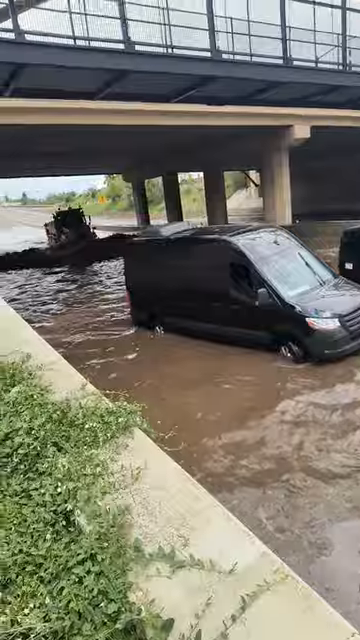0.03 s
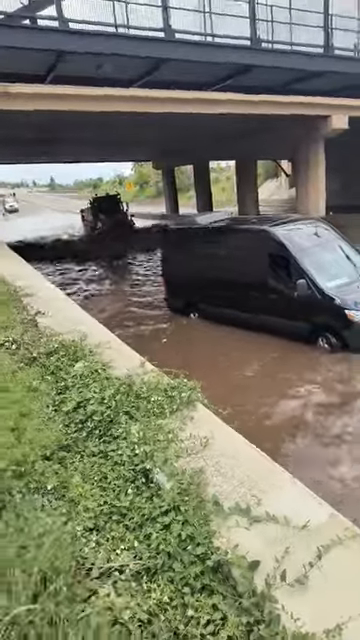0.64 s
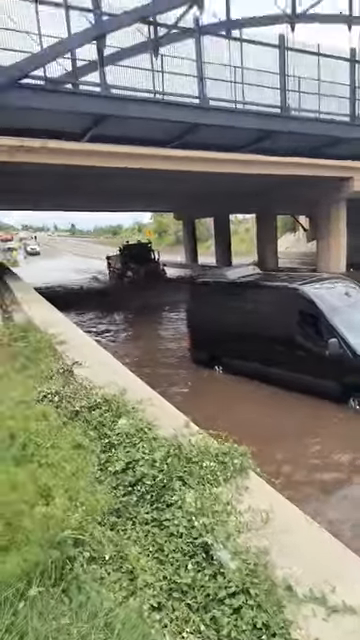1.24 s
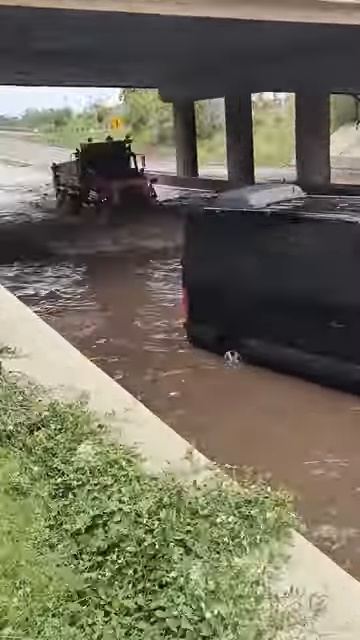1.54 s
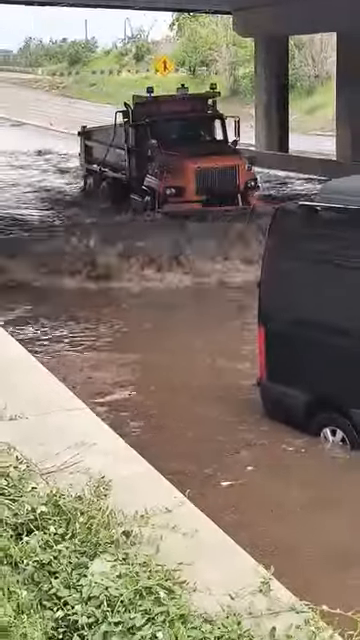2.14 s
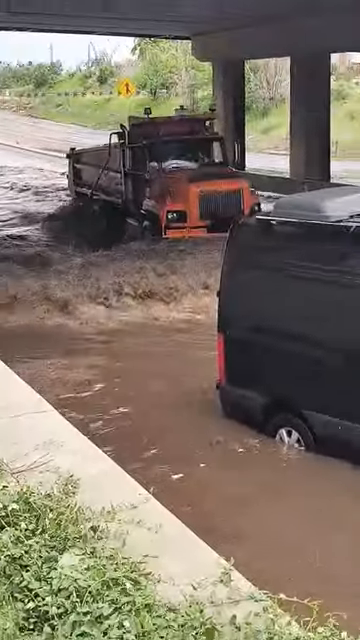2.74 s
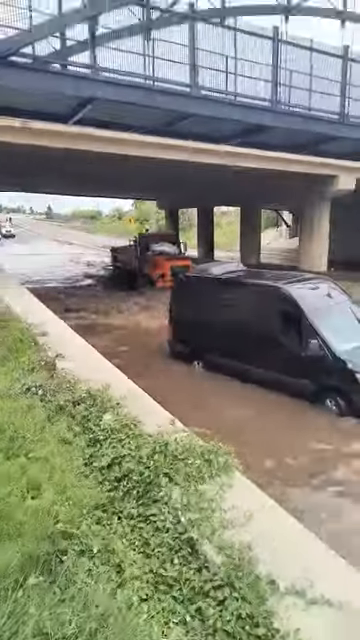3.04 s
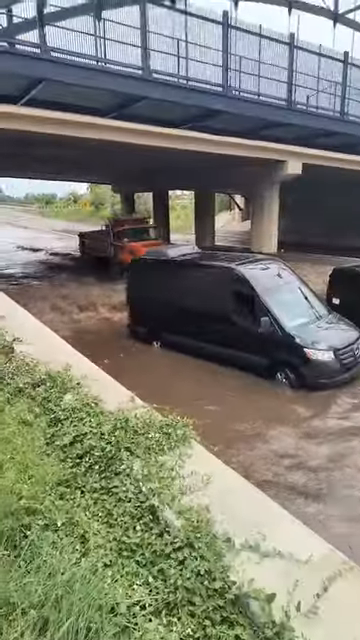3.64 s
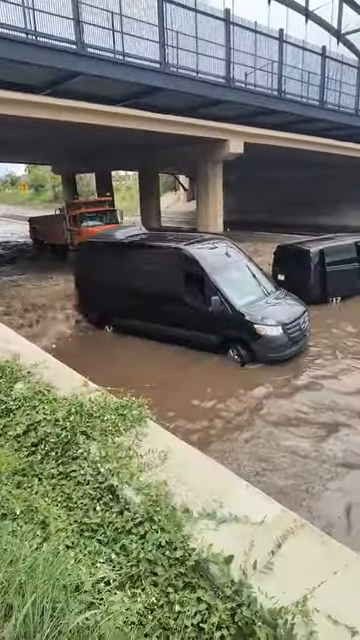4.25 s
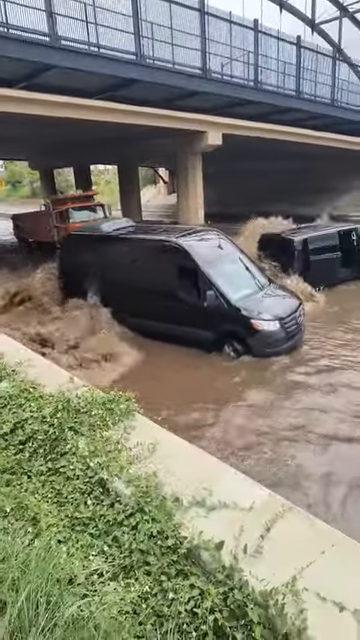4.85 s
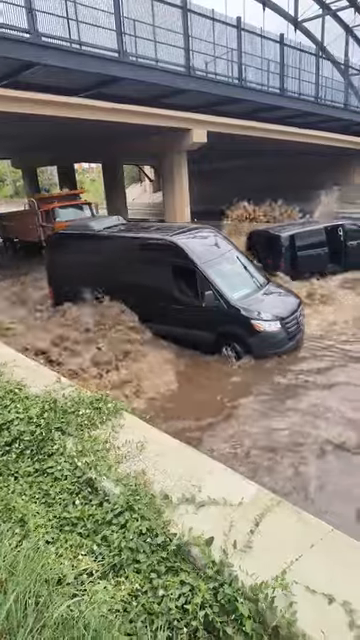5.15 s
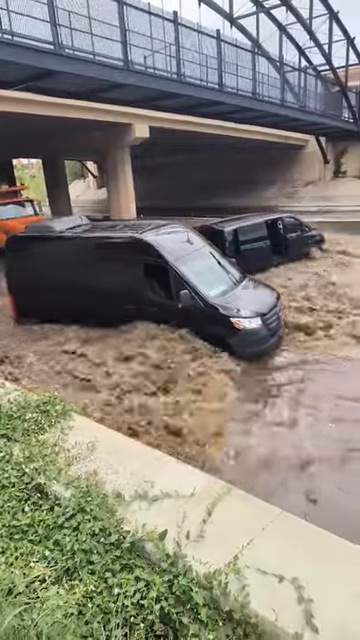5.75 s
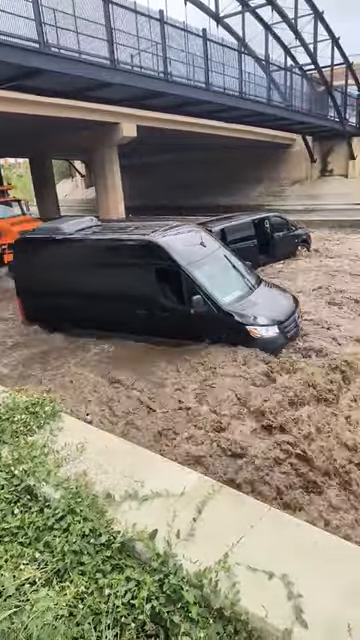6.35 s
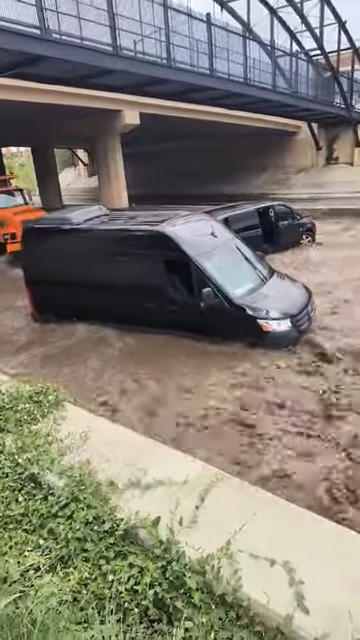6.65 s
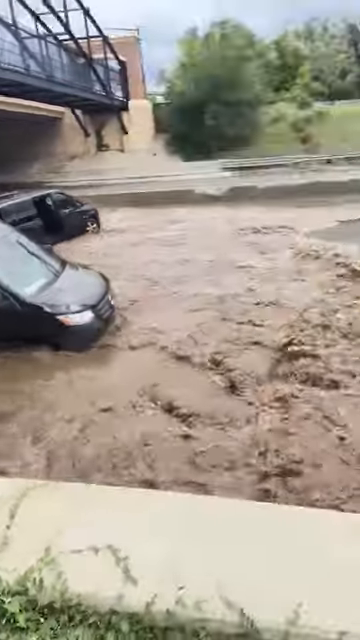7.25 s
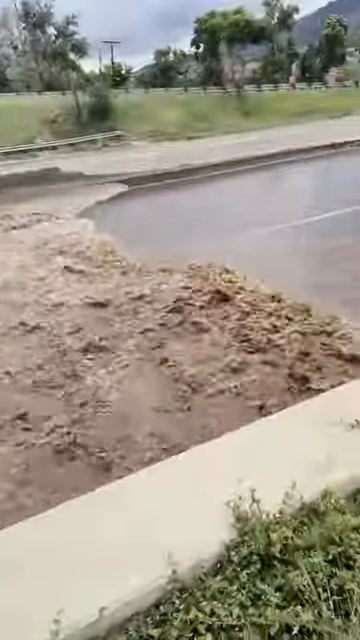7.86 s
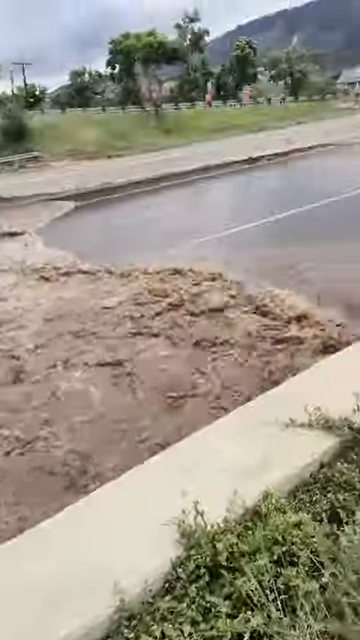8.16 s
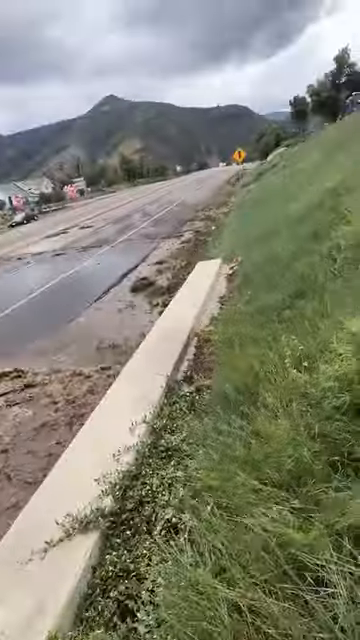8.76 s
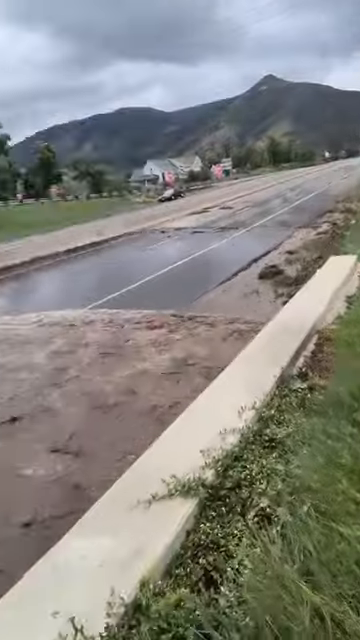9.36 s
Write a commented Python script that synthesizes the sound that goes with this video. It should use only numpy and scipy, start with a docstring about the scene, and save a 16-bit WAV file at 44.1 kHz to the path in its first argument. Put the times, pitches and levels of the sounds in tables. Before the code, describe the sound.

A heavy truck engine clatters and whistles through a flood, giving way to the splashing, gurgling rush of a passing wave.

```python
"""A diesel dump truck ploughs through floodwater under a highway bridge, heard from the bank.
First its firing pulses reverberate off the concrete, with fan tones and turbo whistles above them.
The throttle lifts at 1.1 s; water sheets off the bumper, and from 2.8 s the bow wave slaps two
stranded vans as the engine fades. The wave passes at about 6 s, churning, hissing and ringing
with bubbles, and rushes on up the road. Near 9 s come a faint far whine and rumble."""
import sys
import numpy as np
from scipy import signal
from scipy.fft import rfft, irfft, next_fast_len
from scipy.io import wavfile
from scipy.ndimage import uniform_filter1d, map_coordinates

SR = 44100
rng = np.random.default_rng(int(sys.argv[2]) if len(sys.argv) > 2 else 0)


def int16_out(signal):
    """Quantize to a 16-bit WAV file."""
    q = np.round(np.clip(np.atleast_2d(signal).T, -1, 1) * 32767)
    wavfile.write(sys.argv[1], SR, q.astype(np.int16))


N = 414540
TIME_S = np.arange(N) / SR


def amp(db):
    """Decibels to amplitude ratio."""
    return 10 ** (np.asarray(db) / 20)


def unit(x):
    """Normalisation to rms 1."""
    return x / np.sqrt(np.mean(x ** 2) + 1e-20)


def along(points, hz):
    """Interpolation of (frequency, value) points on a logarithmic frequency axis."""
    freqs, values = np.transpose(points)
    return np.interp(np.log(hz + 1), np.log(freqs + 1), values)


def curves(rows):
    """Linear interpolation in time of each column after the first."""
    times, *columns = np.transpose(rows)
    return [np.interp(TIME_S, times, column) for column in columns]


def wobble(rate_hz):
    """Smooth random modulation: a spline through Gaussian knots."""
    return map_coordinates(rng.standard_normal(int(N * rate_hz / SR) + 4), [TIME_S * rate_hz])


def phase(hz):
    """Phase as the integral of frequency."""
    return 2 * np.pi * np.cumsum(hz * np.ones(N)) / SR


def swell(start_s, end_s, db, attack_s, release_s):
    """Exponential rise, hold and decay: 20 dB down one attack before and one release after the hold."""
    early_s, late_s = np.maximum(start_s - TIME_S, 0), np.maximum(TIME_S - end_s, 0)
    return amp(db - 20 * (early_s / attack_s + late_s / release_s))


def step(at_s, takes_s):
    """A smooth transition from 0 to 1."""
    return .5 + .5 * np.tanh((TIME_S - at_s) / takes_s)


def filtered(x, response):
    """Filtering as multiplication of the spectrum by a frequency response."""
    size = next_fast_len(N + SR // 2)
    return irfft(rfft(x, size) * response(np.fft.rfftfreq(size, 1 / SR)), size)[..., :N]


# Left-right likeness of widespread sound: frequency_hz, correlation
WIDE_CORRELATION = [(60, 0.98), (130, 0.99), (290, 0.99), (640, 0.44), (1410, 0.56), (3100, 0.25),
                    (7000, -0.027), (15000, 0.022)]
def spread(pair, spectrum, correlation=WIDE_CORRELATION):
    """Mid-side mixing turns two independent signals into coloured, partly coherent stereo of rms 1."""
    def response(hz):
        angle = np.arccos(np.clip(along(correlation, hz), -1, 1)) / 2
        return amp(along(spectrum, hz)) * [np.cos(angle), np.sin(angle)]
    mid, side = filtered(pair, response)
    return unit(np.array([mid + side, mid - side]))


def patchy(depth_db):
    """Two noises, modulated by random patches of gain in time and frequency."""
    spectra = signal.stft(rng.standard_normal((2, N)), nperseg=512)[2]
    patches = uniform_filter1d(rng.standard_normal(spectra.shape[1:]), size=7, axis=0)
    patches = unit(uniform_filter1d(patches, size=10, axis=1))
    return unit(signal.istft(spectra * amp(depth_db * patches), nperseg=512)[1][:, :N])


def hiss_band(hz, width_hz):
    """Random quadrature modulation of a carrier gives narrow-band stereo noise."""
    carrier = phase(hz)
    band = lambda: wobble(2 * width_hz) * np.sin(carrier) + wobble(2 * width_hz) * np.cos(carrier)
    return unit(np.array([band(), band()]))


# Reverberation time under the bridge: frequency_hz, t60_s
BRIDGE_DECAY = [(100, 1), (1000, 0.84), (8000, 0.61)]
def bridge(x):
    """Reverberation from deck and piers: convolution with two noise tails whose treble dies first."""
    hz, t, spectra = signal.stft(rng.standard_normal((2, SR * 3 // 4)), SR, nperseg=256)
    decay = amp(-60 * t / along(BRIDGE_DECAY, hz)[:, None])
    tail = signal.istft(spectra * decay, SR, nperseg=256)[1]
    return signal.fftconvolve(x[None], tail / np.linalg.norm(tail[0]), axes=1)[:, :N]


# Airy hisses close by: start_s, end_s, level_db
WISP_TIMES = [(4.02, 4.08, -57), (9.0, 9.08, -69)]
# Their spectrum: frequency_hz, density_db
WISP_SPECTRUM = [(5000, -36), (10500, 0), (15000, 0.5)]
def wisps():
    """High-pass noise swells into brief, soft hisses."""
    envelope = sum(swell(*row, attack_s=.08, release_s=.2) for row in WISP_TIMES)
    return envelope * spread(patchy(depth_db=0.5), WISP_SPECTRUM)


def tick(at_s=3.392, pitch_hz=6900, level_db=-41, t60_s=0.15):
    """A damped sinusoid: one tiny ping that sags in pitch."""
    age_s = np.maximum(TIME_S - at_s, 0)
    envelope = amp(level_db - 60 * age_s / t60_s) * (age_s > 0)
    return envelope * np.sin(phase(pitch_hz + 350 * np.exp(-age_s / 0.0037)))


# A far whine stepping between two pitches: start_s, level_db, pitch_hz, glide_hz_per_s
WHINE_NOTES = [(8.915, -37, 1215, -700), (9.025, -38.5, 1185, -100), (9.075, -39, 1300, 3),
               (9.125, -38, 1210, -250), (9.18, -35.5, 1303, -11.5), (9.24, -37.5, 1215, -700)]
def whine(hold_s=0.049, echo_db=-7):
    """Propagation from far up the road: air and echo blur thin tones in amplitude and phase."""
    direct = np.zeros(N)
    for start_s, db, hz, glide in WHINE_NOTES:
        pitch_hz = hz + glide * np.clip(TIME_S - start_s, 0, 2 * hold_s)
        tone = unit(amp(1.2 * wobble(70)) * np.sin(phase(pitch_hz) + .35 * wobble(70)))
        direct += swell(start_s, start_s + hold_s, db, attack_s=.04, release_s=.06) * tone
    return (direct + amp(echo_db) * bridge(direct)) / np.hypot(1, amp(echo_db))


# Water sheeting off the bumper: frequency_hz, density_db
SHEET_SPECTRUM = [(500, -61.5), (1150, -18), (1400, -3.5), (1650, -3.5), (2000, 7), (2250, -2.5),
                  (2550, -5.5), (2900, 0.5), (3150, -1.5), (3500, -6), (3900, -5.5), (4200, -6.5),
                  (4600, -5.5), (5200, -9), (7000, -18.5), (10000, -83.5)]
def bumper_sheet():
    """Splash noise swells until the truck passes into the acoustic shadow of a van."""
    in_view = 1 - step(3.57, takes_s=0.077)
    envelope = in_view * swell(2.5, 2.5, db=-34.5, attack_s=2, release_s=2)
    return envelope * amp(0.54 * wobble(30)) * spread(patchy(depth_db=3.0), SHEET_SPECTRUM)


# Low swells of rumble: start_s, end_s, level_db, attack_s, release_s
RUMBLES = [(2.96, 3.15, -33.5, 0.17, 0.38), (3.692, 3.85, -33.5, 0.22, 0.28), (4.15, 4.5, -41, 0.28, 3.2),
           (8.899, 9.401, -49, 1, 1)]
# Their spectrum: frequency_hz, density_db
RUMBLE_SPECTRUM = [(20, -35), (60, -20), (105, -2.5), (210, 2.5), (330, -2), (600, -44), (2000, -120)]
def rumble():
    """Amplitude-modulated low noise: water heaving at 3-5 s, a faint far rumble near 9 s."""
    envelope = sum(swell(*row) for row in RUMBLES) * amp(1.5 * wobble(14))
    return envelope * spread(patchy(depth_db=2.0), RUMBLE_SPECTRUM)


def rings(rows, attack_s, t60_s, rise_per_s, roughness=.75):
    """Damped resonances that rise by a share of their pitch and flutter in amplitude and phase."""
    out, t = np.zeros(N + SR), np.arange(SR // 3) / SR
    for start_s, db, hz in rows:
        flutter, jitter = [roughness * map_coordinates(k, [t * 90]) for k in rng.standard_normal((2, 64))]
        envelope = (1 - np.exp(-np.square(t / attack_s))) * amp(db - 60 * t / t60_s)
        tone = np.sin(2 * np.pi * hz * t * (1 + rise_per_s * t / 2) + jitter)
        out[round(start_s * SR):][:len(t)] += envelope * (1 + flutter) * tone
    return out[:N]


# Air pockets under the crest: start_s, level_db, pitch_hz
AIR_POCKETS = [(5.44, -27, 475), (5.49, -27.5, 420), (5.635, -28, 273), (5.82, -30, 478), (5.86, -31, 271),
               (5.902, -25.5, 407), (6.149, -24, 380), (6.257, -24.5, 259), (6.3, -25, 373),
               (6.385, -23.5, 360), (6.41, -24, 438), (6.46, -24, 358), (6.675, -25.5, 424),
               (6.735, -24, 267), (7.06, -26, 477.8), (7.17, -30, 343), (7.36, -28, 350), (7.86, -29, 401)]
def gulps():
    """Bubble resonance: trapped air rings and rises in pitch as it surfaces."""
    return rings(AIR_POCKETS, attack_s=0.0054, t60_s=0.18, rise_per_s=1.7)


# Water striking the vans: start_s, level_db, pitch_hz
VAN_SLAPS = [(2.795, -17.5, 317), (2.965, -26, 270), (3.06, -22, 227.4), (3.69, -24.5, 396),
             (3.742, -21, 284), (3.85, -22.5, 253), (4.175, -30, 235), (4.432, -24.5, 333),
             (4.497, -29, 514), (4.765, -23.5, 246), (4.802, -25, 251), (4.845, -27, 289),
             (4.935, -32.5, 305)]
def slaps():
    """Impact excitation: each short shove of water booms against a van's side."""
    return rings(VAN_SLAPS, attack_s=0.006, t60_s=0.23, rise_per_s=0.068)


def passing_db(nearest_db, loss_share, lead_s=0):
    """Spherical spreading: a layer of the passing wave takes a share of the inverse-distance loss."""
    nearest_s, nearest_m, speed_m_per_s = 5.97, 7.5, 4.4
    distance_m = np.hypot(nearest_m, speed_m_per_s * (TIME_S + lead_s - nearest_s))
    return nearest_db - loss_share * 20 * np.log10(distance_m / nearest_m)


def bubbles(count, centre_hz, cycles, size_db):
    """Bubbles as damped oscillators of rising pitch, a few much louder than the rest, in two channels."""
    when, pitch, size, angle = rng.random((count, 4)).T[:, :, None]
    n = np.arange(384)
    turns = centre_hz * 4 ** (pitch - .5) * n / SR
    age = turns / cycles
    envelope = np.exp(-3 * age) * (1 - n / len(n)) * amp(size_db * np.minimum(-np.log(1 - size), 5))
    ring = envelope * np.sin(2 * np.pi * turns * (1 + 0.12 * np.minimum(age, 1)))
    at = ((when * N).astype(int) + n).ravel()
    panned = [ring * pan(2 * np.pi * angle) for pan in (np.cos, np.sin)]
    return unit(np.array([np.bincount(at, channel.ravel(), N)[:N] for channel in panned]))


# Two drifting bands of water hiss: time_s, centre_hz, level_db
HISS_UPPER = [(2.9, 4722, -64), (3.35, 4400, -54), (4.15, 4736, -46), (4.55, 4650, -51.5),
              (5.3, 4430, -40.5), (5.9, 4440, -44.5), (6.7, 4168, -40.5), (7.3, 4346, -44.5),
              (8.15, 4320, -43.5), (8.6, 4490, -54), (9.1, 4480, -48)]
HISS_LOWER = [(2.7, 3100, -63), (3.4, 3150, -45), (4.15, 2720, -46), (4.6, 2780, -46), (5.3, 2950, -41.5),
              (6.0, 3050, -48), (6.8, 3420, -42.5), (7.5, 3300, -48), (8.1, 3100, -46.5), (8.9, 3200, -53)]
def water_hiss(surge_db):
    """Narrow-band noise: two bands of water hiss drift in pitch and level as the microphone turns."""
    def band(hz, db, width_hz):
        gain = amp(db + surge_db + .3 * wobble(10) + 1.7 * wobble(50))
        return gain * hiss_band(hz + 50 * wobble(12), width_hz)
    return band(*curves(HISS_UPPER), width_hz=430) + band(*curves(HISS_LOWER), width_hz=340)


# Falling spray: frequency_hz, density_db
SPRAY_SPECTRUM = [(400, -64), (1900, 3), (2650, -5), (3100, -6.5), (3700, 0.5), (4500, -1.5), (5300, -7),
                  (6500, -11), (7700, -16), (8600, -33.5), (13000, -28), (15200, -21)]
def spray(surge_db):
    """Falling drops make broadband hiss and the high resonances of small bubbles."""
    drops = patchy(depth_db=1.5) + amp(-12) * bubbles(6000, centre_hz=3830, cycles=12.5, size_db=1.5)
    level_db = passing_db(-36.5, loss_share=1) + surge_db + 0.55 * wobble(60)
    return amp(level_db) * spread(drops, SPRAY_SPECTRUM)


# Air pockets in the folding crest: frequency_hz, density_db
FOLD_SPECTRUM = [(150, -50), (300, -9), (380, -6.5), (490, -5), (570, -2.5), (720, -24), (2500, -120)]
def fold():
    """Cavity resonance colours noise into a hollow roll as the crest folds over."""
    envelope = swell(6.5, 6.5, db=-34, attack_s=0.5, release_s=5.5) * amp(1.2 * wobble(20))
    return envelope * spread(patchy(depth_db=1.5), FOLD_SPECTRUM)


# Rushing water: frequency_hz, density_db
RUSH_SPECTRUM = [(80, -67), (300, -33), (550, -6.5), (760, -4), (950, -2), (1200, -4), (1600, -5.5),
                 (2000, -11.5), (2500, -15.5), (3500, -18), (9000, -110)]
def rush(surge_db):
    """Superposition: noise and thousands of bubble resonances merge into a rush."""
    gurgle = patchy(depth_db=1.7) + amp(-13.5) * bubbles(12000, centre_hz=1295, cycles=18, size_db=1.2)
    return amp(passing_db(-30.5, loss_share=0.48) + surge_db) * spread(gurgle, RUSH_SPECTRUM)


# Heavy churning: frequency_hz, density_db
CHURN_SPECTRUM = [(26, -64.5), (50, -49.5), (70, -22), (120, -11), (180, -10.5), (250, -2), (350, 0.5),
                  (480, -0.5), (640, -7), (800, -12.5), (1100, -16.5), (4000, -120)]
def churn(surge_db):
    """Low turbulence noise peaks among the vans, ahead of the spray."""
    level_db = passing_db(-32, loss_share=0.51, lead_s=0.4) + surge_db + 0.27 * wobble(11)
    return amp(level_db) * spread(patchy(depth_db=2.0), CHURN_SPECTRUM)


def bow_wave():
    """Common modulation: one random surge binds churn, rush, spray and hiss; the fold swells alone."""
    surge_db = 0.2 * wobble(9.7) + 0.38 * wobble(35)
    return churn(surge_db) + fold() + rush(surge_db) + spray(surge_db) + water_hiss(surge_db)


# Turbo whistles: start_s, end_s, level_db, attack_s, release_s, pitch_hz, width_hz, glide_hz_per_s
TURBO_WHISTLES = [(.37, 0.418, -35.5, 0.22, .3, 3610, 901, -100),
                  (0.402, 0.798, -46.5, .4, 0.24, 4930, 150.4, -200),
                  (0.847, 1.107, -45.5, .4, 0.056, 4860, 120, -450),
                  (.84, 1.09, -44.5, 0.45, 0.068, 3110, 328, 0),
                  (0.948, 1.224, -53, .15, .2, 5600, 150, -1000),
                  (1.348, 1.434, -36.5, 0.39, 0.38, 3350, 309.3, -60),
                  (2.151, 2.7, -41.5, 0.23, 1.6, 2890, 199.9, 110),
                  (2.197, 3.0, -48.5, 0.37, 0.48, 4740, 150, -330)]
def turbo():
    """Narrow-band noise with a gliding centre gives the turbo's breathy, unsteady whistles."""
    out = np.zeros((2, N))
    for start_s, *shape, hz, width_hz, glide in TURBO_WHISTLES:
        envelope = swell(start_s, *shape) * amp(1.8 * wobble(16))
        out += envelope * hiss_band(hz + glide * (TIME_S - start_s) + 45 * wobble(11), width_hz)
    return out


# Surges of the cooling fan's tone: start_s, end_s, level_db
FAN_SURGES = [(.2, .5, -23.5), (.56, .68, -28.5), (.78, .9, -21), (1.03, 1.15, -34), (2.04, 2.08, -27)]
# Its partials: blade_rate_multiple, relative_db
FAN_HARMONICS = [(1, 14.5), (2, -2.5), (3, -11.5), (4, -25.5)]
# Overtones howling as the fan works against the flood: start_s, end_s, level_db, blade_rate_multiple
FAN_HOWLS = [(0.297, 1.05, -36.5, 2), (0.448, .9, -31.5, 3), (1.35, 1.454, -33, 2), (1.48, 1.72, -31, 3),
             (1.916, 1.97, -27.5, 3), (2.063, 2.09, -32.5, 3)]
def fan(firing, blades_per_firing=3.875):
    """Blade-passing harmonics of the belt-driven fan; its howls are modulated at the firing rate."""
    blades = blades_per_firing * firing + 0.32 * wobble(15)
    tone = sum(amp(db + 1.6 * wobble(18)) * np.sin(k * (blades + 0.06 * wobble(60)))
               for k, db in FAN_HARMONICS)
    out = unit(tone) * sum(swell(*row, attack_s=0.12, release_s=0.14) for row in FAN_SURGES)
    for *span, multiple in FAN_HOWLS:
        flutter = amp(2.5 * wobble(45)) * (1 + .45 * np.cos(firing))
        howl = unit(flutter * np.sin(multiple * blades + .75 * wobble(40)))
        out += swell(*span, attack_s=0.27, release_s=0.13) * howl
    return out


# Pulse of each cylinder in firing order: relative_strength
CYLINDER_PULSES = [0.8, 0.12, 0.21, 0.13, 1.4, 0.34]
# Left-right likeness of the truck, a compact source: frequency_hz, correlation
TRUCK_CORRELATION = [(60, 1), (290, 0.96), (520, 0.29), (760, 0.81), (1150, 0.57), (1700, 0.2),
                     (3100, 0.47), (7000, 0.19)]
def combustion(firing, spectrum, scatter, gas_db, sharpness):
    """Source and filter: a reverberant pulse and a puff of turbulent gas per firing, then a spectrum."""
    at = np.flatnonzero(np.diff(firing // (2 * np.pi)))
    pulses = np.zeros(N)
    pulses[at] = np.resize(CYLINDER_PULSES, len(at)) + scatter * rng.standard_normal(len(at))
    gas = unit(patchy(depth_db=2.5) * np.exp(sharpness * np.cos(firing)))
    return spread(unit(bridge(pulses)) + amp(gas_db) * gas, spectrum, TRUCK_CORRELATION)


# Combustion clatter: frequency_hz, density_db
CLATTER_SPECTRUM = [(500, -85), (900, -46), (1350, -1.5), (1700, -0.5), (2200, -2.5), (2480, -10.5),
                    (2900, -8.5), (3800, -12), (5000, -14), (6000, -25.5), (7500, -32.5), (9000, -80.5),
                    (15000, -42)]
def clatter(firing, lifted, lift_db=-3):
    """Uneven impulsive excitation gives a bright rattle, strongest under full throttle."""
    envelope = swell(0.4, 0.7, db=-25, attack_s=0.8, release_s=1.5)
    envelope *= amp(lift_db * lifted + 0.78 * wobble(40))
    return envelope * combustion(firing, CLATTER_SPECTRUM, scatter=0.86, gas_db=2.5, sharpness=0.14)


# Exhaust hum: time_s, level_db
HUM_LEVEL = [(.16, -49.5), (.55, -37.5), (1.12, -41.5), (1.28, -34.5), (2.7, -48), (3.33, -45), (3.43, -74),
             (8.3, -63), (9.3, -53.5)]
def exhaust_hum(firing):
    """The fundamental of the exhaust lies at the firing rate."""
    gain = amp(curves(HUM_LEVEL)[0] + 2.4 * wobble(22))
    return gain * unit(np.sin(firing + 0.23 * wobble(40)))


# Brief drones from the truck: start_s, end_s, level_db, firing_rate_multiple
TRUCK_DRONES = [(0.29, 0.901, -31, 3), (.4, .62, -33.5, 11), (0.197, 1.083, -31.5, 8),
                (1.167, 1.191, -26, 4.1), (1.266, 1.575, -29, 3), (1.681, 1.694, -21.5, 4.67),
                (1.806, 1.84, -26, 3.9), (1.985, 2.138, -25, 3.9), (2.257, 2.8, -33.5, 4.67),
                (2.3, 2.85, -31.5, 3.7)]
def drones(firing):
    """Constant frequency ratios: brief drones follow the engine's speed."""
    out = np.zeros(N)
    for *span, multiple in TRUCK_DRONES:
        tone = amp(1.8 * wobble(25)) * unit(np.sin(multiple * firing + 0.26 * wobble(33)))
        out += swell(*span, attack_s=0.097, release_s=.06) * tone
    return out


# Exhaust pipe response: frequency_hz, density_db
PIPE_SPECTRUM = [(40, -38), (75, -33), (110, -18.5), (150, -12.5), (190, -8.5), (255, -1), (310, 1),
                 (385, -5), (440, -5.5), (550, -12), (680, -26), (900, -62.5), (2000, -120)]
def exhaust_boom(firing, load_db, lifted, throttle_db=-3, deep_db=3):
    """Firing pulses excite the pipe's low resonances, harder as the truck shoves into deep water."""
    in_deep_water = step(1.72, takes_s=.03) - step(2.05, takes_s=.03)
    level_db = -3 + 0.82 * load_db + throttle_db * (1 - lifted) + deep_db * in_deep_water
    gain = amp(level_db + 0.71 * wobble(9))
    return gain * combustion(firing, PIPE_SPECTRUM, scatter=0.59, gas_db=2, sharpness=0.11)


# Engine block response: frequency_hz, density_db
BLOCK_SPECTRUM = [(200, -68), (540, -11), (640, -0.5), (740, 1.5), (850, -1), (960, -0.5), (1070, -2),
                  (1180, 0.5), (1280, -10.5), (1410, -20), (1600, -11), (1850, -16), (2300, -38),
                  (6000, -120)]
def block_roar(firing, load_db):
    """Forced vibration: combustion drives a midrange roar from the block that follows the load."""
    gain = amp(load_db + .6 * wobble(18))
    return gain * combustion(firing, BLOCK_SPECTRUM, scatter=0.52, gas_db=-1, sharpness=0.4)


# Speed of the six-cylinder engine: time_s, firing_rate_hz
FIRING_RATE = [(.3, 93.32), (.75, 95.64), (.9, 94.7), (1.1, 85.62), (1.7, 82.92), (2.4, 80.6), (2.7, 78.6),
               (3.15, 73.28), (9.4, 75.7)]
# How hard it is heard to work: time_s, level_db
ENGINE_LOAD = [(.16, -24.5), (.42, -20), (1.08, -22), (1.16, -25), (1.4, -24), (2.09, -24), (2.15, -29),
               (2.8, -29), (3.2, -35), (3.5, -39), (5, -53), (9.4, -59)]
def truck():
    """Phase locking: exhaust, block, clatter, drones and fan all follow one firing phase."""
    firing = phase(curves(FIRING_RATE)[0])
    load_db, = curves(ENGINE_LOAD)
    lifted = step(1.113, takes_s=.03)  # the driver comes off full throttle
    return (exhaust_hum(firing) + exhaust_boom(firing, load_db, lifted) + block_roar(firing, load_db)
            + clatter(firing, lifted) + drones(firing) + fan(firing))


def scene():
    """Linear superposition of truck, flood and faint background sounds."""
    return (truck() + turbo() + bumper_sheet() + rumble() + bow_wave() + slaps() + gulps()
            + whine() + wisps() + tick())


# Turning of the microphone: time_s, left_lead_ms
PORT_LEAD = [(.5, 0.14), (2, 0.055), (4.5, 0.013), (5.4, -0.027), (6.7, -0.13), (7.8, -0.028),
             (9.4, -0.013)]
# Balance for sound from the bridge and from the water below: frequency_hz, left_minus_right_db
BALANCE_AHEAD = [(60, 0), (130, -1), (230, -0.5), (370, -6.5), (480, 4.5), (720, 2), (1150, -1),
                 (1700, -3.5), (3000, -2.5), (4400, -2), (8000, -7.5), (12000, 4.5)]
BALANCE_BELOW = [(60, -0.5), (110, -1), (200, -0.5), (380, -3.5), (520, -7.5), (720, 6.5), (1050, 2),
                 (1400, -5.5), (2380, 1), (4400, -3.5), (8000, -6.5), (12000, 5.5)]
def record(dry, start_s=.16, top_hz=15600):
    """Time and level differences between two ports give direction; silent at first, band-limited."""
    lead_samples = curves(PORT_LEAD)[0] * SR / 1000
    sides = np.array([[.5], [-.5]])
    turned = np.array([map_coordinates(x, [np.arange(N) + side * lead_samples], mode="nearest")
                       for x, side in zip(dry, sides)])
    ported = lambda balance: filtered(turned, lambda hz: amp(along(balance, hz) * sides))
    below = step(2.6, takes_s=.4)  # the sound moves from under the bridge to the water below
    heard = (1 - below) * ported(BALANCE_AHEAD) + below * ported(BALANCE_BELOW)
    opening = np.clip((TIME_S - start_s) / .002, 0, 1)
    return filtered(opening * heard, lambda hz: hz < top_hz)


dry = scene()
out = record(dry)
int16_out(out)
```